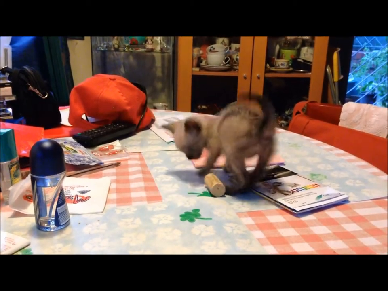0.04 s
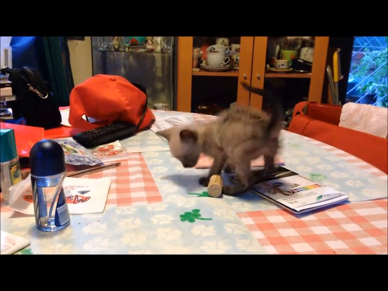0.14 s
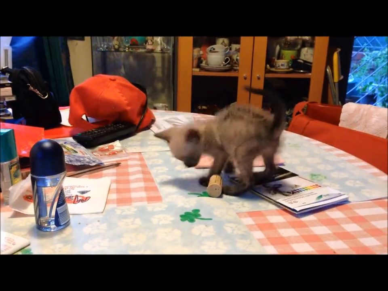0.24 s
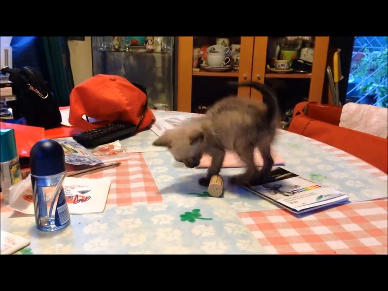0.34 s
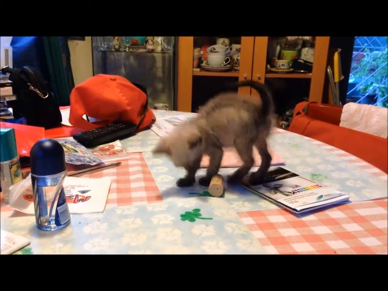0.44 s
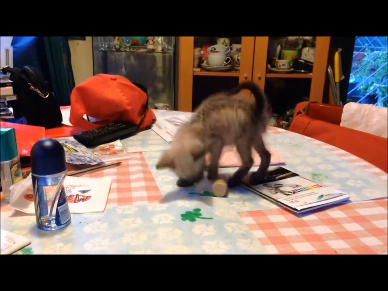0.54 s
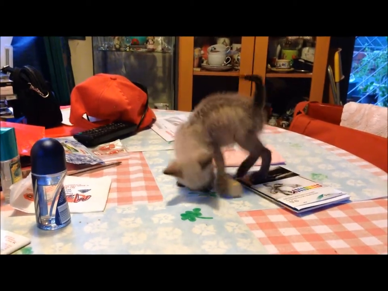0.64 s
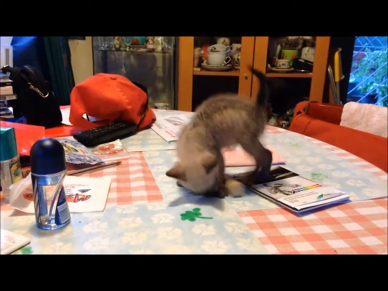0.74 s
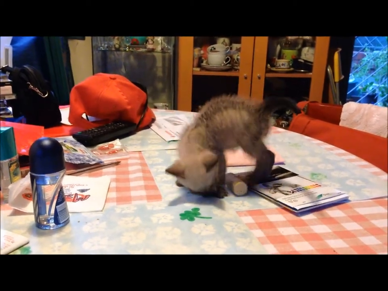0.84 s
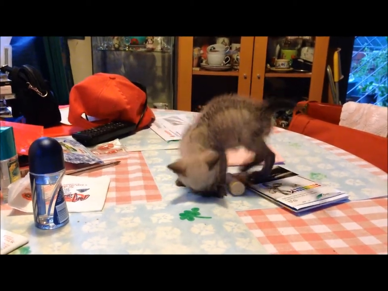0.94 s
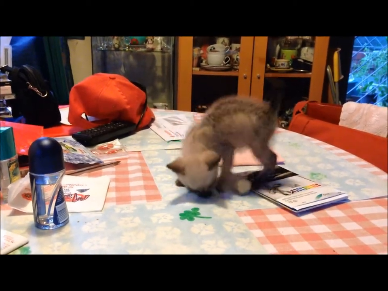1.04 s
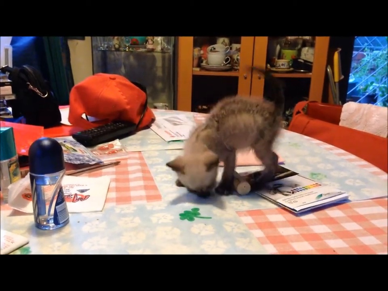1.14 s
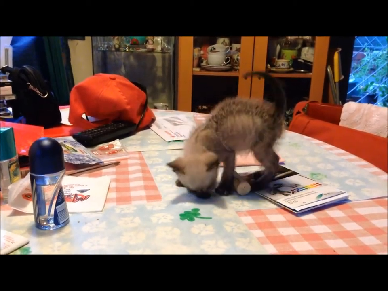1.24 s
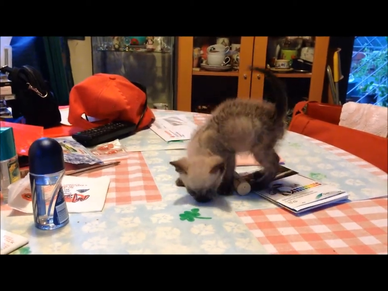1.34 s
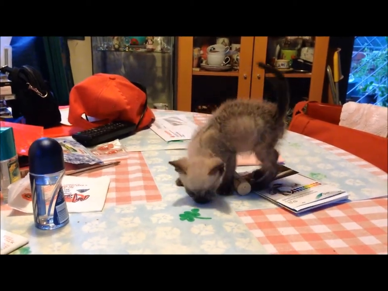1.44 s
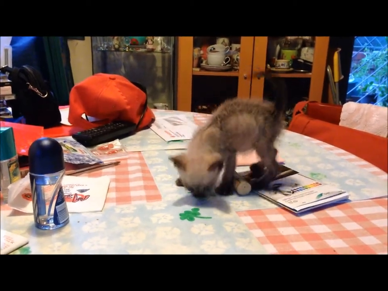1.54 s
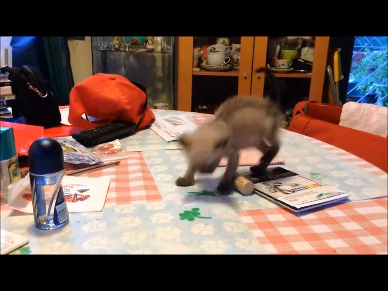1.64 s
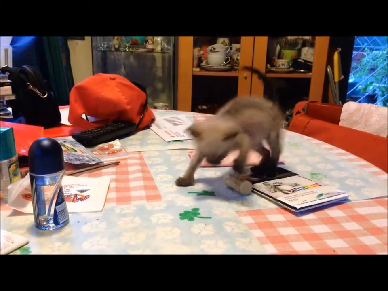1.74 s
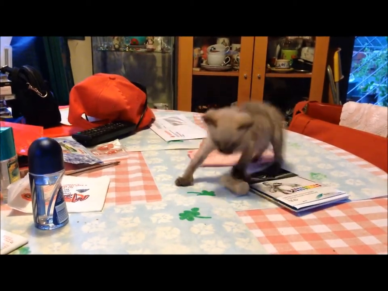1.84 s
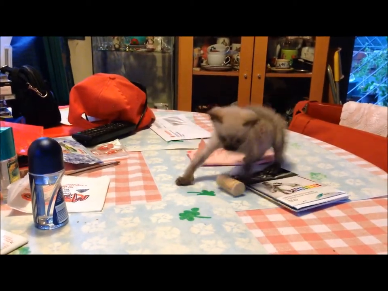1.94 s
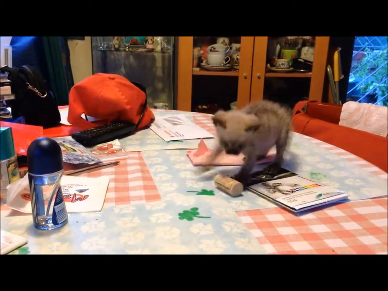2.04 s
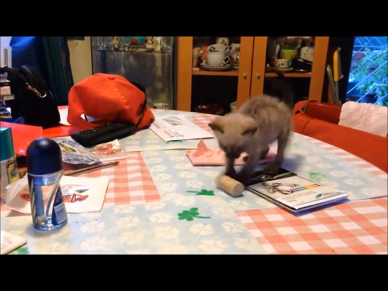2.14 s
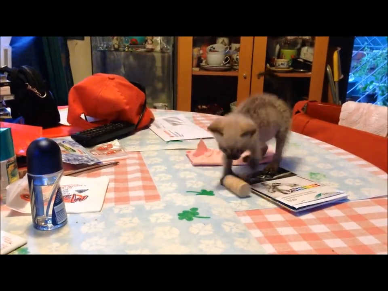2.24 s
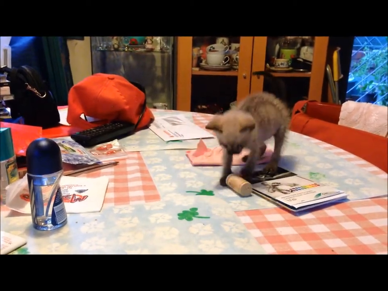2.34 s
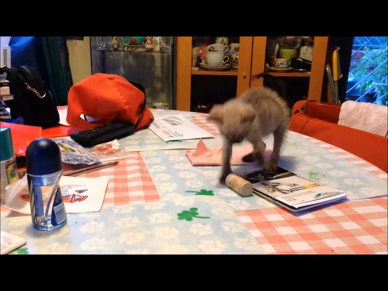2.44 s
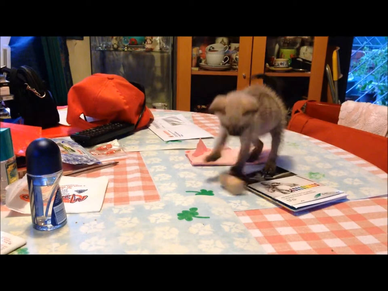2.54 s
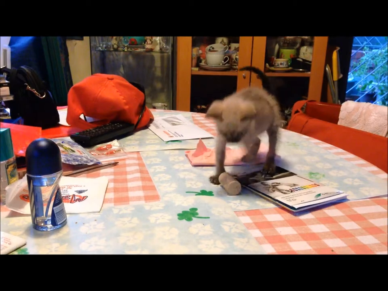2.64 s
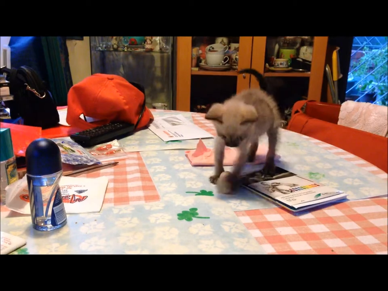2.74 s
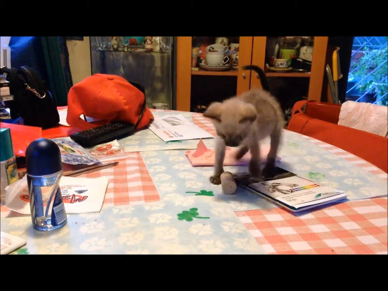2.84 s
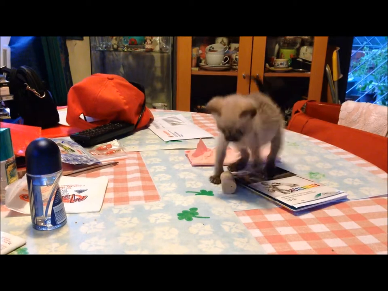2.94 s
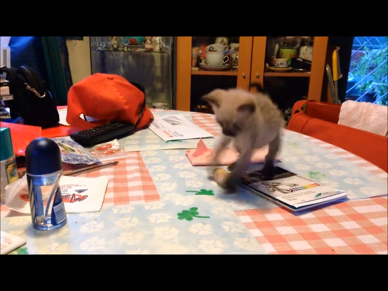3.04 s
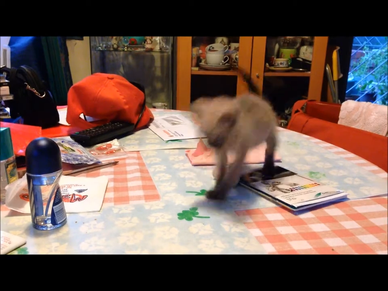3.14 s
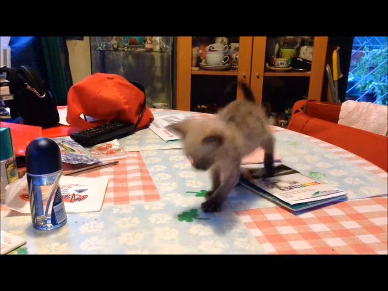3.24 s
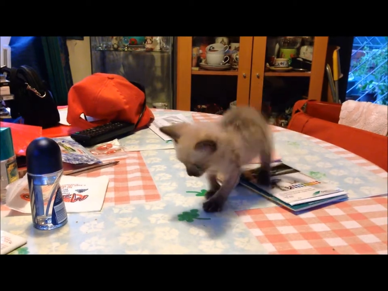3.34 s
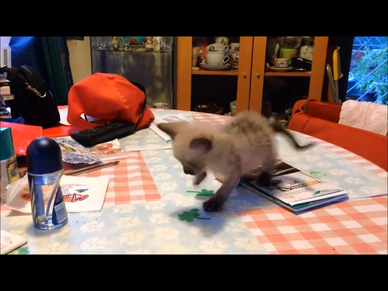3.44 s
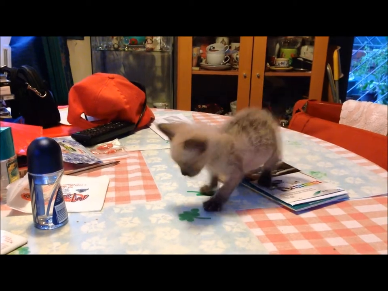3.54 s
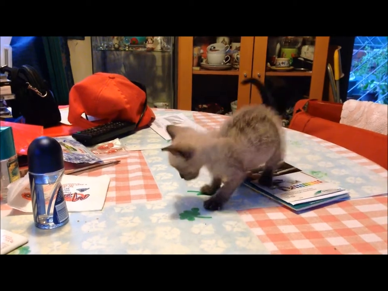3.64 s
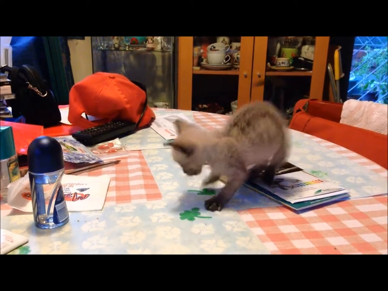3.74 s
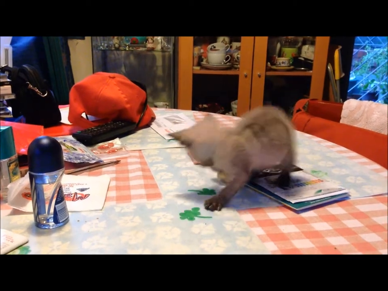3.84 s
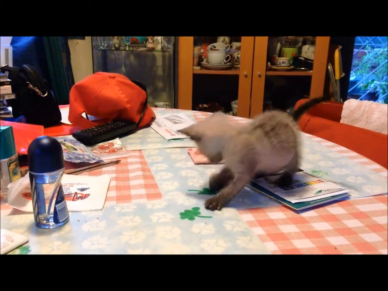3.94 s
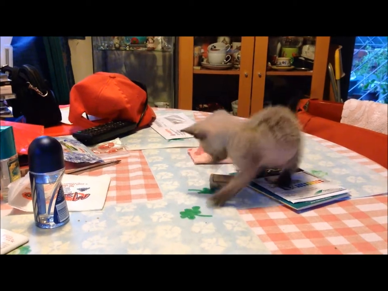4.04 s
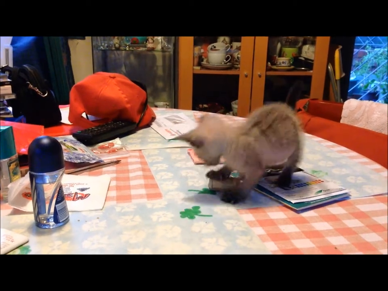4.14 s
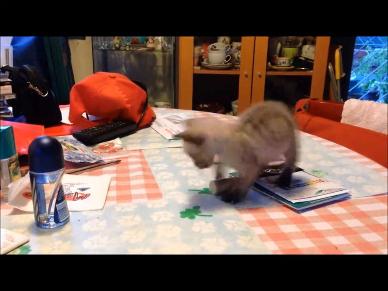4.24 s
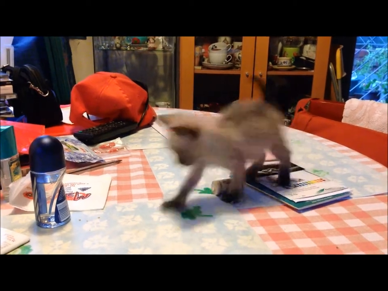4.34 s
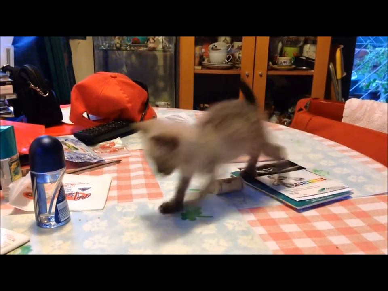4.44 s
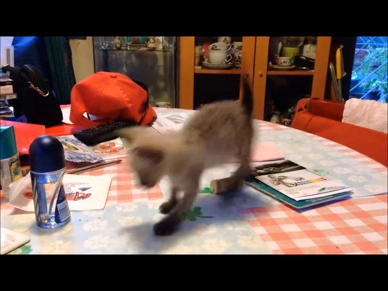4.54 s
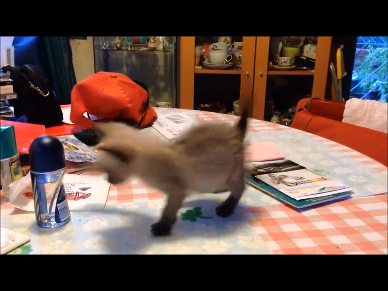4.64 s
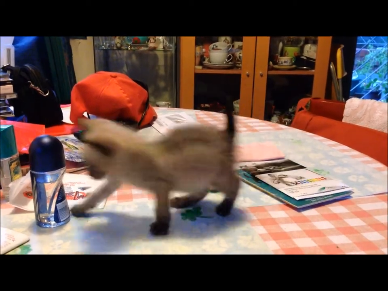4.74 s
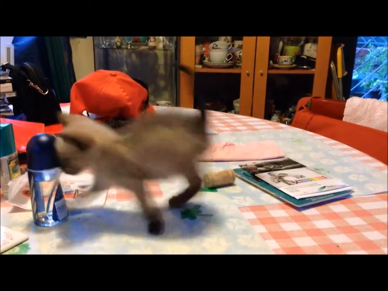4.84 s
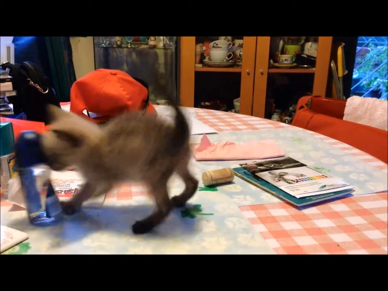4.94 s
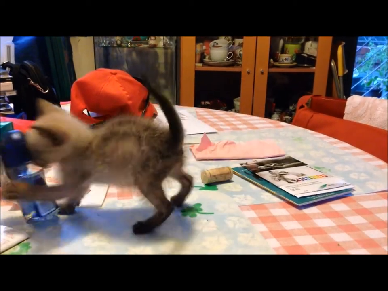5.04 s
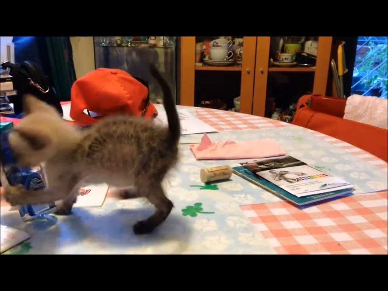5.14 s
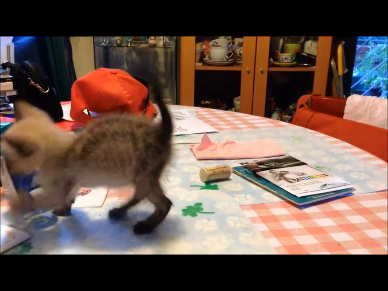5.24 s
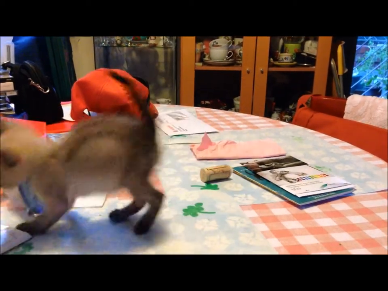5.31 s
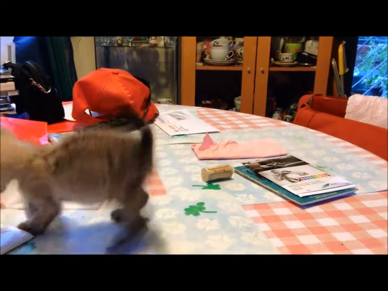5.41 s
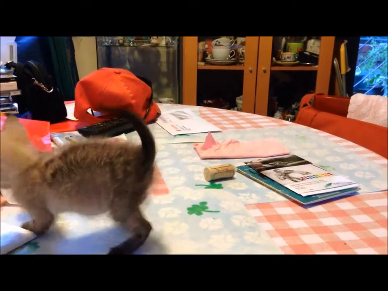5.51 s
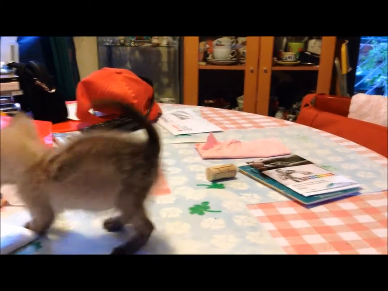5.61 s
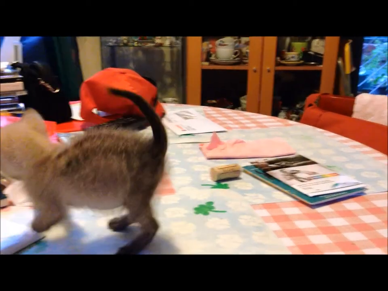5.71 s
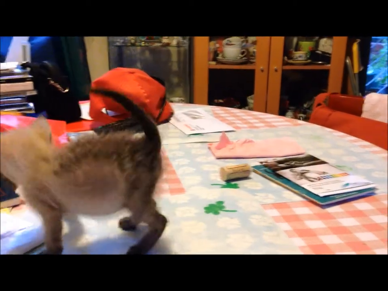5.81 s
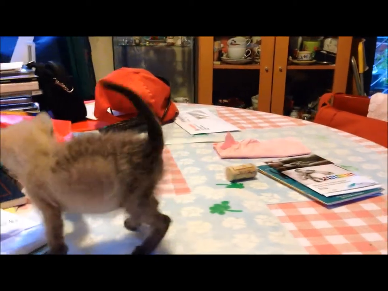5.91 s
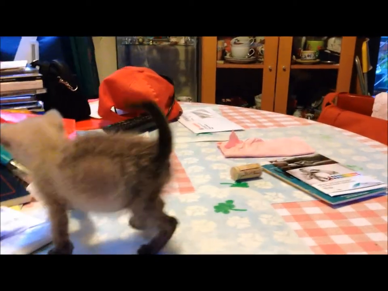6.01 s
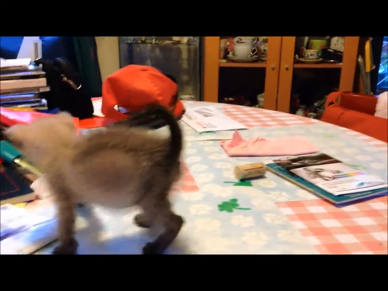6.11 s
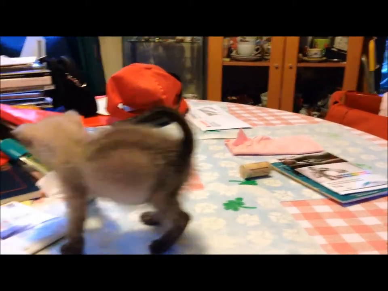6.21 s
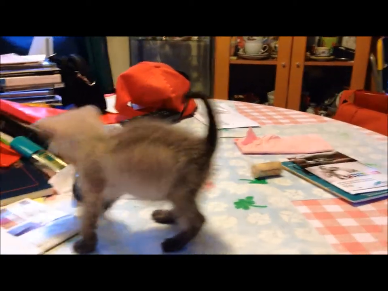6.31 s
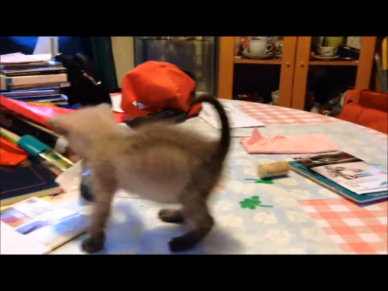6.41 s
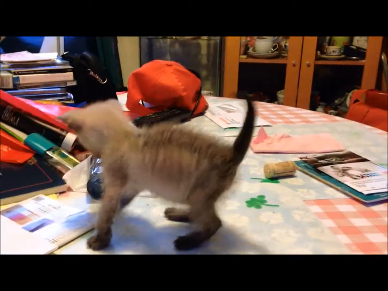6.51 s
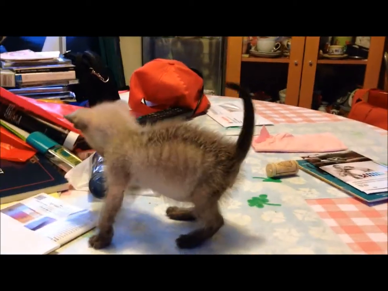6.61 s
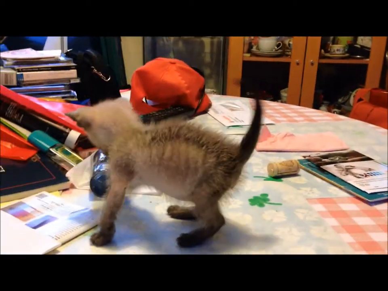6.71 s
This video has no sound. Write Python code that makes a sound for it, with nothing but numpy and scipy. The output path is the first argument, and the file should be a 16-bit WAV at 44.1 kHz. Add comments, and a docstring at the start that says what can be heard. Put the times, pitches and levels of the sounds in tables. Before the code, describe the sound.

Scattered taps of a cork and soft paws on a cloth-covered table, and a small bottle toppling with a thump in a quiet room.

```python
"""Dry taps sound on a cloth-covered wooden table, first from a cork a kitten bats about, later paw taps
and clicks: their modes are so damped that they last only a few cycles. Paws pat, claws tick, dragged
things scuff by stick-slip friction, and blows ring the modes of the board. The kitten walks into a small
bottle, which clicks, topples with a thump, bounces once and rolls. A quiet furnished room answers
briefly over a faint hiss and drone."""
import sys
import numpy as np
from scipy import signal
from scipy.fft import rfft, irfft, next_fast_len
from scipy.io import wavfile

SR = 44100
rng = np.random.default_rng(int(sys.argv[2]) if len(sys.argv) > 2 else 0)


def unload_audio(sound):
    """Save the sound as a 16-bit wav file, at the path given as the first command line argument."""
    columns = np.transpose(np.atleast_2d(sound))
    # keep every value between -1 and 1, then stretch to whole-number steps
    steps = np.round(np.clip(columns, -1, 1) * 32767)
    wavfile.write(sys.argv[1], SR, steps.astype(np.int16))


N = 298557


def taps():
    """Impacts on the table make dry taps: first from the batted cork, later paw taps and clicks."""
    # Each row: start in seconds, level in dB, pitch in Hz, relative snap and claw tick levels in dB.
    contacts = [(0.2036, -25, 1880, -24, -42), (0.7478, -39.5, 1900, -11, -11),
                (1.0913, -32.5, 1380, -14.5, -19), (1.0981, -37, 1230, -8.5, -17),
                (1.1366, -25.5, 2290, -20, -17), (1.1585, -25.5, 1780, -19, -41),
                (1.7584, -46.5, 1340, -5.5, -25), (2.0148, -23.5, 2260, -10.5, -22),
                (2.3305, -34.5, 2030, -9, -15), (2.5542, -30, 2120, -9.5, -17),
                (3.0616, -30, 1960, -10, -16.5), (3.092, -38.5, 1830, -32, -22),
                (3.7927, -32, 1400, -11, -14.5), (3.8164, -35.5, 2130, -19, -29),
                (3.888, -42, 1820, -17, -23), (3.9828, -28.5, 2590, -6, -25),
                (3.9935, -22.5, 2280, -4.5, -22), (4.411, -39.5, 2200, -8.5, -10),
                (4.584, -39.5, 1960, -14, -18), (4.6205, -38.5, 2106, -5, -18),
                (4.793, -33, 2600, -1, -16.5), (4.9387, -42.5, 2320, -2.5, -7.5),
                (5.3368, -27.5, 1740, -10.5, -24.5), (5.8172, -40.5, 2005, -13.5, -20),
                (6.3771, -27.5, 2370, -12.5, -20), (6.5643, -30, 2190, -13, -18),
                (6.5691, -34, 1450, -8.5, -21)]
    out = np.zeros(N)
    for start, db, pitch_hz, snap_db, tick_db in contacts:
        wet_db = -11.5 - 0.44 * (db + 33)  # fainter taps lie farther off and are wetter
        add(out, start, amp(db) * in_room(dry_tap(pitch_hz, snap_db, tick_db), wet_db))
    return out


def dry_tap(pitch_hz, snap_db, tick_db):
    """Heavy damping ends a tap within a few cycles of its main mode and of a higher snap."""
    t = clock(.03)
    hardness = amp(snap_db)  # a soft contact has little snap and leaves a longer, purer tone
    body = blip(t, pitch_hz, cycles=0.98 + 0.4 * np.exp(-hardness / 0.15))
    snap = hardness * amp(10) * blip(t, hz=3800, cycles=0.83)
    tick = amp(tick_db) * band(rng.standard_normal(len(t)), 6800, octaves=0.68) * np.exp(-t / 0.0016)
    direct = body + snap + tick
    # early reflections from the tabletop and its clutter colour each tap differently
    clutter = rng.standard_normal(len(t)) * t * np.exp(-t / 0.0029)
    reflections = signal.fftconvolve(direct, unit(clutter) / np.sqrt(len(t)))[:len(t)]
    struck = direct + amp(-6.5) * reflections
    return butterworth(struck, 0.42 * pitch_hz, "high", order=3)  # a small source radiates little bass


def bottle():
    """Impacts excite the modes of the bottle's hard shell, which clicks as it tips, lands and bounces."""
    # Each row: start in seconds, peak level in dB, gain of the modes below 2500 Hz in dB.
    knocks = [(5.4126, -13, -2), (5.428, -40.5, -22.5), (5.4916, -33, -6.5), (5.5319, -22.5, 2.5),
              (5.5483, -35.5, -4)]
    # Each row: mode frequency in Hz, level in dB, time to decay by 60 dB in seconds.
    modes = [(1186, -1, 0.0028), (1762, -1.5, 0.0079), (3400, -12.5, 0.0041), (4900, -4, 0.0036),
             (6540, -13, 0.0094), (8140, -6, 0.0054), (11500, -18.5, .004)]
    out, t = np.zeros(N), clock(.05)
    for start, db, low_db in knocks:
        ring = sum(damped_mode(t, hz, level + low_db * (hz < 2500), t60) for hz, level, t60 in modes)
        crack = amp(-11.5) * band(rng.standard_normal(len(t)), 4500, octaves=0.99) * np.exp(-t / 0.0015)
        click = (ring + crack) * (1 - np.exp(-t / 0.00014))
        add(out, start, amp(db) * in_room(crest(click), wet_db=-9.5))
    return out


def tabletop():
    """Paws, cork and bottle excite the modes of one board; soft contacts reach only the low ones."""
    # Each row: start in seconds, gain in dB, cutoff in Hz (lower for a softer contact).
    blows = [(1.042, -31.5, 205), (1.0927, -39, 1190), (1.099, -36, 1190), (1.159, -36, 1230),
             (1.758, -42, 1170), (2.554, -45, 1070), (3.058, -34, 232), (3.792, -30.5, 1080),
             (3.802, -27, 250), (3.8868, -36.5, 1050), (4.94, -35.5, 724), (4.942, -26, 140),
             (5.3368, -38.5, 1220), (5.409, -16, 210), (5.4681, 2.5, 1147), (5.5326, -3.5, 1160),
             (6.378, -41, 1126)]
    # Each row: mode frequency in Hz, level in dB, time to decay by 60 dB in seconds before added damping.
    modes = [(68.3, -42, 0.37), (94.9, -32, 0.21), (122.6, -20.5, 0.18), (177.3, -17.5, 0.17),
             (204.7, -15, 0.11), (237.1, -19, 0.24), (265, -30, 0.41), (280.6, -23.5, 0.21),
             (317.7, -17.5, .16), (341.7, -23, .25), (403.7, -26, 0.21), (421.4, -14.5, 0.077),
             (478, -35.5, 0.2596), (588, -38.5, 0.31), (641, -18, 0.058), (689, -32.5, 0.16),
             (749, -3.5, 0.015), (850, -17, .035), (920, -32.5, 0.12), (998, -24, 0.078),
             (1466, -19, 0.064)]
    free_damping, rest_damping, rebound_db = 2.8, 30, -24  # damping in 1/s
    out, t = np.zeros(N), clock(.7)
    ring = sum(damped_mode(t, hz, db, t60) for hz, db, t60 in modes) * (1 - np.exp(-t / 0.0013))
    for start, db, cutoff_hz in blows:
        # light things stay on the board and damp it, heavy blows rebound
        damping = free_damping + rest_damping / (1 + amp(db - rebound_db) ** 2)
        thump = butterworth(ring * np.exp(-damping * t), cutoff_hz, "low", order=12)
        # the board's slowest motions push hardly any air, and a resting weight stops them first
        thump = butterworth(thump, 58 + 2.2 * damping, "high", order=3)
        add(out, start, amp(db) * in_room(thump, wet_db=-16))
    return out


def paws():
    """A soft impact on cloth makes a burst of noise: the pad pats and the weave crackles under it."""
    # Each row: start in seconds, peak level in dB.
    steps = [(0.496, -49.5), (.777, -48), (1.033, -53.5), (1.432, -51.5), (1.489, -51.5), (1.729, -50.5),
             (2.662, -45), (2.727, -43.5), (2.878, -48.5), (3.202, -47), (3.242, -47), (3.376, -54),
             (3.426, -46), (3.597, -56), (4.182, -47), (4.438, -44), (4.741, -47.5), (4.950, -47),
             (4.985, -48.5)]
    out, t = np.zeros(N), clock(.03)
    envelope = t * np.exp(-t / 0.0012)
    for start, db in steps:
        pad, weave = rng.standard_normal((2, len(t)))
        rub = band(pad, 1810, octaves=0.46) + amp(-6.5) * band(weave, 4200, octaves=0.6)
        add(out, start, amp(db) * in_room(crest(rub * envelope), wet_db=-7.5))
    return out


def claws():
    """A brief contact makes a high transient: claw tips tick faintly on their own."""
    # Each row: start in seconds, level in dB, pitch in Hz.
    ticks = [(.1775, -44, 7000), (0.9939, -40.5, 7600), (2.6994, -46.5, 4240), (4.1375, -42, 7700),
             (4.5092, -38, 4190)]
    out = np.zeros(N)
    for start, db, pitch_hz in ticks:
        add(out, start, amp(db) * in_room(blip(clock(.01), pitch_hz, cycles=0.83), wet_db=-13))
    return out


def scuffs():
    """Stick-slip friction: paws, cork and the bottle's rim drag over cloth and paper in tiny slips."""
    # Each row: start in seconds, length in seconds, level in dB, centre frequency in Hz.
    drags = [(0.625, 0.054, -66.5, 1900), (1.908, 0.03, -64, 2000), (2.216, 0.043, -63, 2050),
             (2.555, 0.047, -58.5, 2000), (2.734, 0.037, -61.5, 4480), (3.069, 0.049, -56, 4320),
             (3.775, 0.024, -48.5, 6000), (3.778, 0.062, -55.5, 1190), (3.971, 0.048, -47, 3900),
             (4.409, 0.014, -46.5, 9600), (5.411, 0.13, -53, 5500), (5.465, 0.009, -34.5, 1653),
             (5.535, 0.014, -39.5, 2900), (5.741, 0.012, -52.5, 5500), (6.356, 0.049, -53.5, 3480),
             (6.57, 0.039, -52, 4200)]
    # Each row: centre frequency in Hz, band width in octaves.
    widths = [(1200, .9), (2000, .48), (3800, .9), (6000, .85), (9600, 0.52)]
    out = np.zeros(N)
    for start, length, db, centre_hz in drags:
        t = clock(length)
        slips = rng.standard_normal(len(t)) * amp(11 * rng.standard_normal(len(t)))
        stroke = band(slips, centre_hz, along(widths, centre_hz)) * np.sin(np.pi * t / length)
        add(out, start, amp(db) * in_room(stroke, wet_db=-5))
    return out


def bottle_roll(start=5.8, length=0.46):
    """Rolling noise: the fallen bottle's hollow rumble on the cloth swells and fades."""
    out, t = np.zeros(N), clock(length)
    rumble = band(rng.standard_normal(len(t)), 414, octaves=0.41)
    add(out, start, amp(-67.5) * rumble * np.sin(np.pi * t / length))
    return out


def in_room(x, wet_db):
    """Reverberation adds a diffuse tail, new for each sound, in which the treble dies first."""
    # Each row: frequency in Hz, reverberation time in seconds.
    decay_times = [(150, 0.37), (600, 0.31), (2000, 0.22), (5000, .2), (12000, 0.097)]
    hz, t, spectra = signal.stft(rng.standard_normal(SR // 2), SR, nperseg=256)
    decay = amp(-60 * t / along(decay_times, hz)[:, None])
    tail = signal.istft(spectra * decay, SR, nperseg=256)[1]
    tail *= 1 - np.exp(-np.arange(len(tail)) / SR / 0.0065)  # the reflections build up
    response = amp(wet_db) * tail / np.linalg.norm(tail)
    response[0] += 1  # direct sound
    return signal.fftconvolve(x, response)


def room_tone():
    """Ambient noise: steady broadband hiss and rumble, with a narrow low drone that sinks away."""
    # Each row: frequency in Hz, relative spectral density in dB.
    spectrum = [(15, -37.5), (25, -21.5), (55, -9.5), (96, -4.5), (164, -2), (267, -2.5), (359, -8.5),
                (741, -14.5), (826, -15.5), (1410, -19.5), (1800, -16), (2770, -16.5), (3530, -14.5),
                (13500, -18.5), (15500, -20.5)]
    # Each row: time in seconds, level of the drone in dB.
    drone_levels = [(0, -73), (1.1, -74), (1.4, -79), (6.701, -83)]
    hush = unit(filtered(rng.standard_normal(N), lambda hz: amp(along(spectrum, hz))))
    drone = band(rng.standard_normal(N), 63, octaves=0.13)
    drone_db = np.interp(np.arange(N) / SR, *np.transpose(drone_levels))
    return amp(-63) * hush + amp(drone_db) * drone


def damped_mode(t, hz, db, t60):
    """Free vibration: a sine that decays by 60 dB in t60 seconds."""
    return amp(db - 60 * t / t60) * np.sin(2 * np.pi * hz * t)


def blip(t, hz, cycles):
    """A heavily damped mode that peaks after the given cycles and soon dies."""
    age = t * hz / cycles
    return age ** 2 * np.exp(2 * (1 - age)) * np.sin(2 * np.pi * hz * t)


def filtered(x, response):
    """Linear filtering: the spectrum of x times a function of frequency."""
    size = next_fast_len(2 * len(x))
    return irfft(rfft(x, size) * response(np.fft.rfftfreq(size, 1 / SR)), size)[:len(x)]


def band(x, centre_hz, octaves):
    """x through a bell-shaped band, at rms 1."""
    return unit(filtered(x, lambda hz: np.exp(-.5 * (np.log2((hz + 1) / centre_hz) / octaves) ** 2)))


def butterworth(x, cutoff_hz, kind, order):
    """x through a maximally flat low-pass or high-pass."""
    return signal.sosfilt(signal.butter(order, cutoff_hz, kind, fs=SR, output="sos"), x)


def along(points, hz):
    """Interpolation of (Hz, value) points on a logarithmic frequency axis."""
    frequencies, values = np.transpose(points)
    return np.interp(np.log(hz + 1), np.log(frequencies + 1), values)


def amp(db):
    """Decibels to gain."""
    return 10 ** (np.asarray(db) / 20)


def unit(x):
    """x at rms 1."""
    return x / np.sqrt(np.mean(x ** 2) + 1e-20)


def crest(x):
    """x at peak 1."""
    return x / np.max(np.abs(x))


def clock(length):
    """Sample times over a length in seconds."""
    return np.arange(int(length * SR)) / SR


def add(track, start, sound):
    """Mix a sound into the track at a start in seconds."""
    part = track[max(round(start * SR), 0):][:len(sound)]
    part += sound[:len(part)]


def scene():
    """Superposition: the sounds on the table and the room tone sum in one channel."""
    mix = taps() + paws() + claws() + scuffs() + tabletop() + bottle() + bottle_roll() + room_tone()
    return mix[None]


def record(dry):
    """Band limiting: an ideal low-pass removes everything above 15600 Hz."""
    return np.array([filtered(channel, lambda hz: hz < 15600) for channel in dry])


dry = scene()
out = record(dry)
unload_audio(out)
```